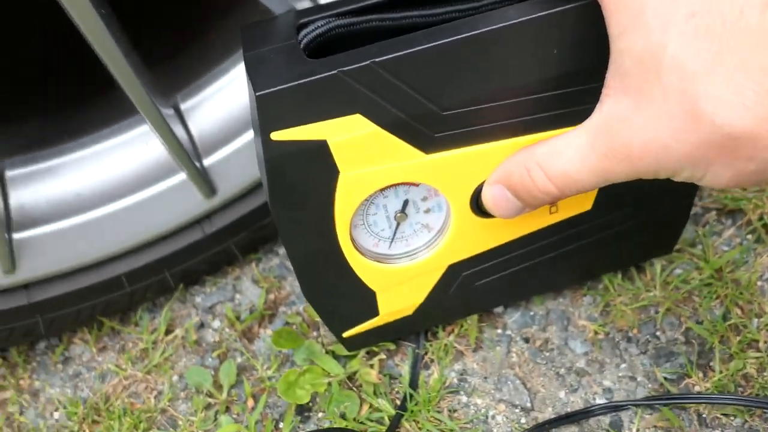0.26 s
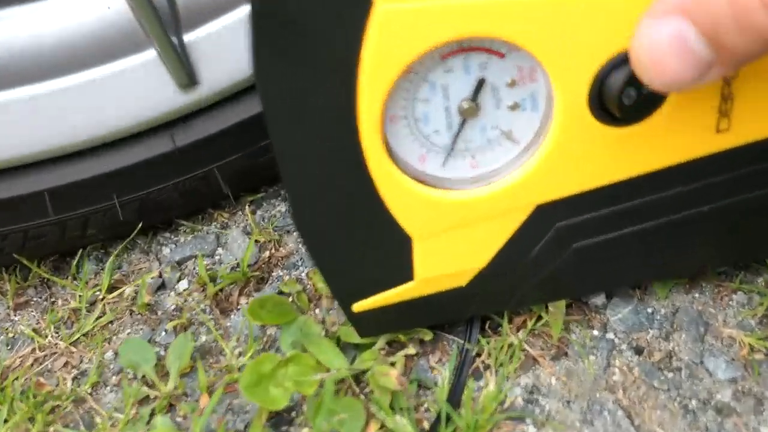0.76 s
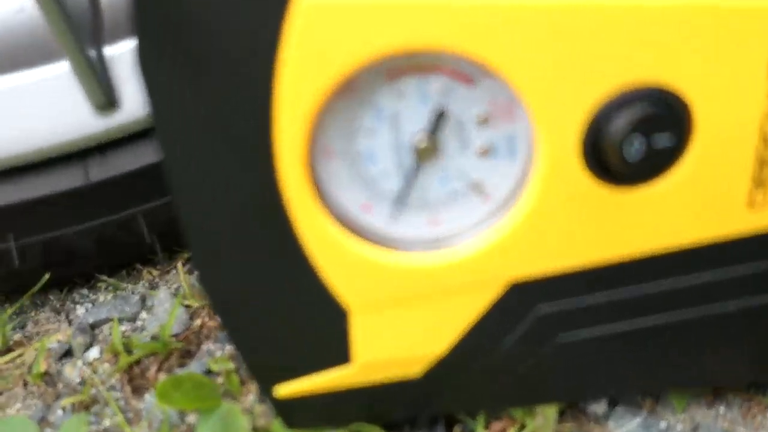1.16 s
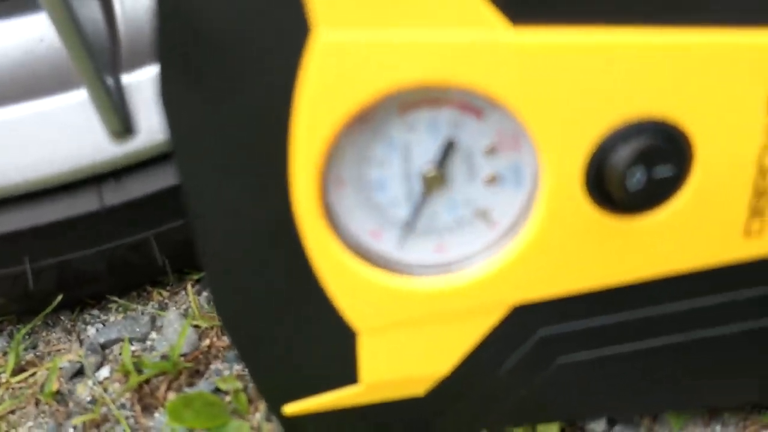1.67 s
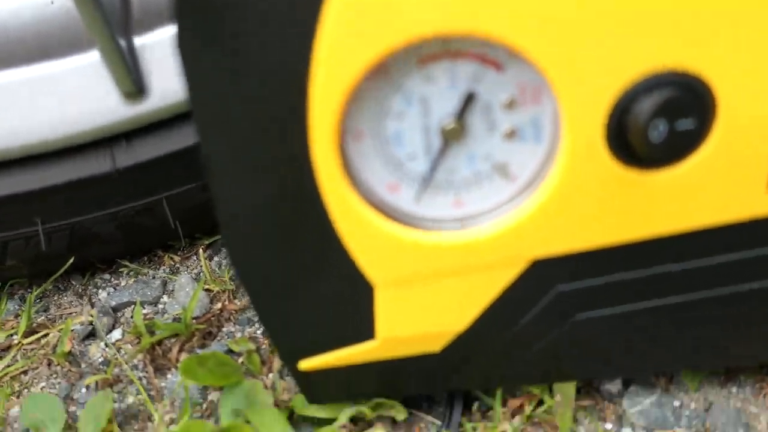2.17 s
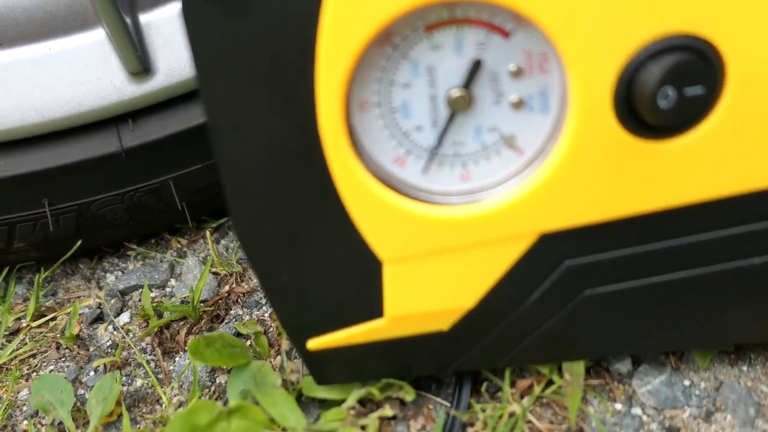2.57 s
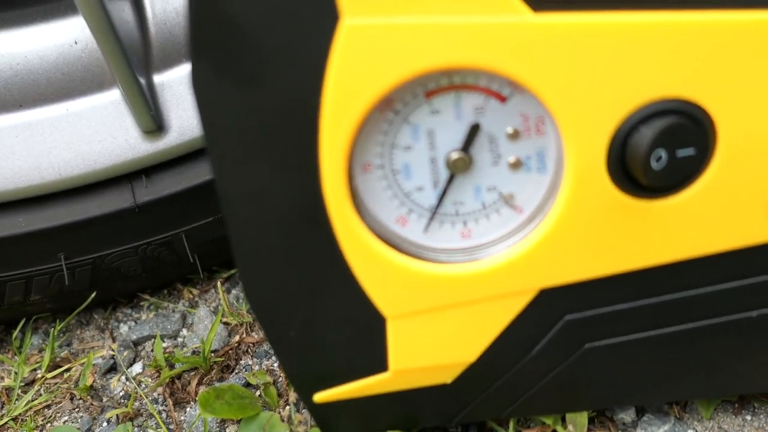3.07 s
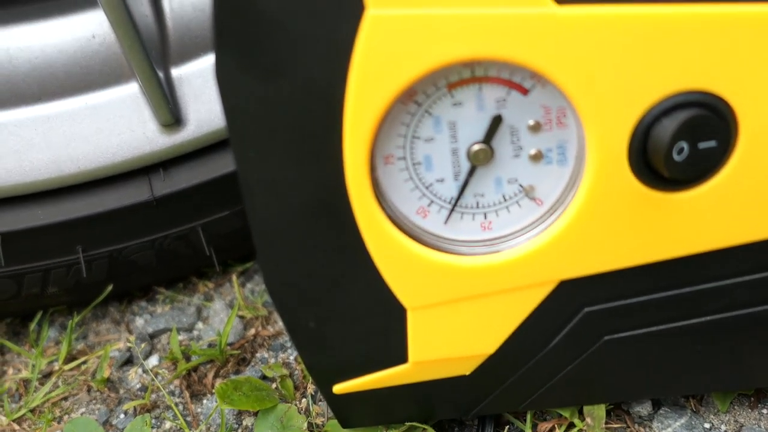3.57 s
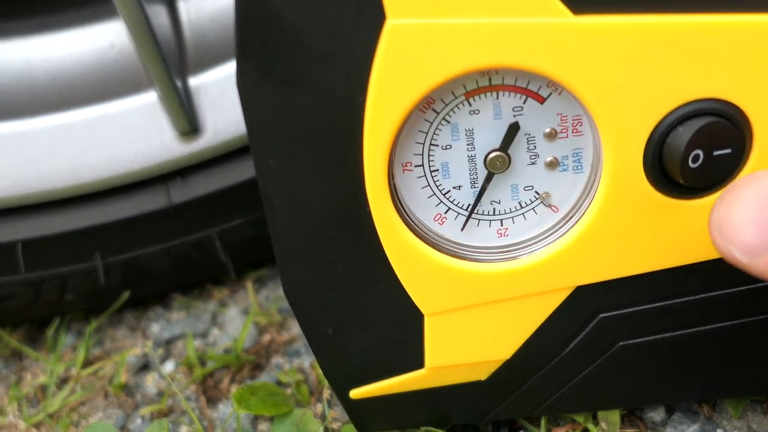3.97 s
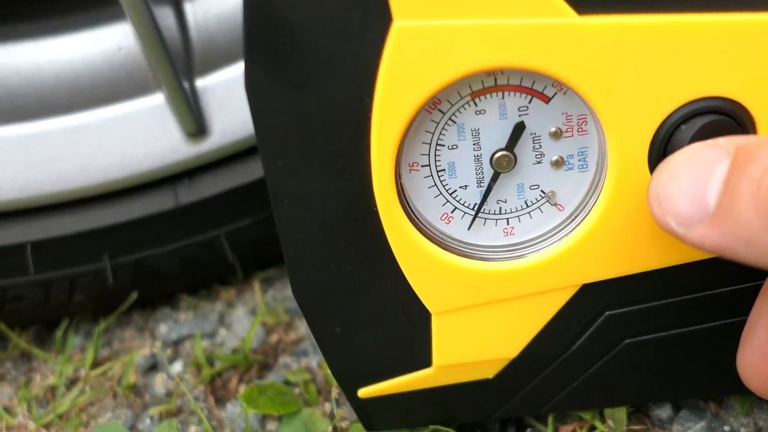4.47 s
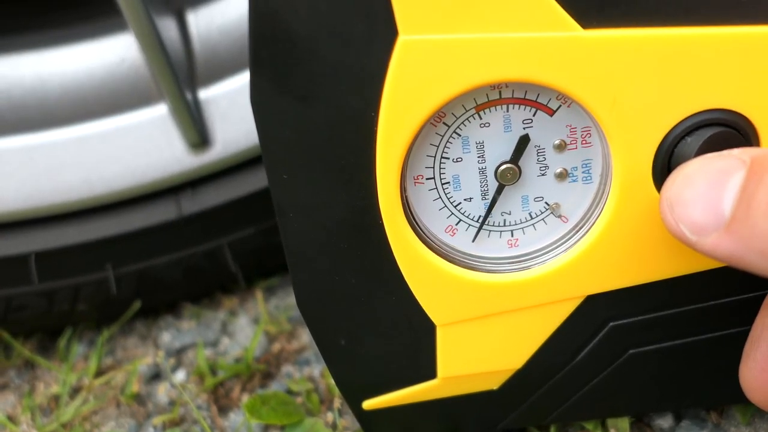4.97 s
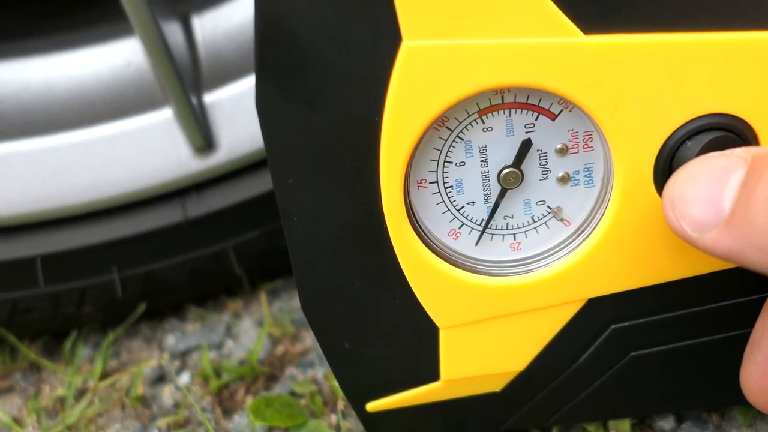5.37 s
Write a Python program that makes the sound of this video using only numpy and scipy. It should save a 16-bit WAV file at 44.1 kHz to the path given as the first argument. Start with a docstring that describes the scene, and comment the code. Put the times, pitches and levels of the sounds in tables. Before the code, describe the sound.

A small electric air compressor runs for the whole five and a half seconds, outdoors beside a car, heard close and slightly to the right. It makes a fast, even, buzzing rattle, about 48 piston knocks a second, ringing its plastic casing over a motor hum and a puffing hiss. At first a hand grips the casing; between 0.5 and 0.9 seconds it lets go, and the tone shifts with a brief, thin, high ring. From about 2 to 3 seconds the microphone backs away and the compressor becomes noticeably quieter, then holds that level at the same speed. Short, hard, irregular clacks stand out above the drone, thickest from 2 to 3.5 seconds, then again, a little lower in pitch, from 4 to 5 seconds. A faint, low car idle continues underneath. The compressor is still running at the end.

```python
"""A small piston compressor on gravel beside an idling car, heard from a phone held close.
A fast motor drives the crank through gears; valve knocks and tooth rattle ring the plastic casing
once a turn, over a hum and a puffing hiss. At first a hand grips the casing and changes its ring;
it lets go within a second. The microphone then backs away and the compressor grows quieter, while
hard strokes clack above the rest, mostly from two to five seconds. The car idles throughout."""
import sys
import numpy as np
from scipy import signal
from scipy.fft import rfft, irfft, next_fast_len
from scipy.io import wavfile

SR = 44100
rng = np.random.default_rng(int(sys.argv[2]) if len(sys.argv) > 2 else 0)


def waveform_to_disk(signal):
    """Save audio, clipped to [-1, 1], as 16-bit WAV at the path in sys.argv[1]."""
    frames = np.transpose(np.atleast_2d(signal))
    scaled = np.clip(frames, -1, 1) * 32767
    samples = np.round(scaled).astype(np.int16)
    wavfile.write(sys.argv[1], SR, samples)


N = 247842

# idling engine: time_s, firing_hz, level_db
CAR_IDLE = [(0, 25.97, -53), (.9, 25.74, -56.5), (1.5, 26.3, -56), (2, 26.45, -57.5), (2.6, 26.04, -56.5),
            (3.6, 26.32, -56), (4.4, 25.97, -58), (5.62, 26.1, -58)]
# exhaust harmonics 2, 3, ... of the firing rate: relative_db
EXHAUST_HARMONICS = [-17, -4, -1, 1.1, 1.5, -7.5, -2, -14, 1, -1.5, -4, -32]
# thin hiss at the very top: time_s, level_db
TOP_HISS = [(0, -47.5), (.9, -49.5), (1.9, -56), (2.3, -54.5), (3.9, -56), (4.4, -59), (5.62, -56.5)]
# spectrum of the valve hiss: frequency_hz, gain_db
VALVE_SPECTRUM = [(100, -49), (400, -12), (672, -3.5), (1350, -9.5), (1620, -4), (2900, -6.5), (3660, -4.5),
                  (5560, -15.5), (9060, -28.5), (12000, -65)]
# speed of the crank: time_s, turns_per_s
CRANK_SPEED = [(0, 47.6), (.75, 47.56), (1.05, 47.71), (1.65, 48.25), (1.95, 48.07), (2.25, 47.62),
               (2.55, 47.58), (4.05, 48.18), (4.65, 47.7), (4.95, 47.87), (5.62, 48.1)]
# compressor at the microphone: time_s, gain_db, drone_lift, treble_db, leftward_lean
AT_MICROPHONE = [(0, -20, -4.5, 1, 0.5), (.5, -22, -1.5, 0.5, 0), (.65, -19.5, 1, 1.5, 0.5),
                 (.8, -21, -1.5, 2.5, 0), (.95, -21, -6.5, 2, -0.5), (1.12, -21, -0.5, 1, -1),
                 (1.18, -21.5, -7, 1, -0.9), (1.25, -21.5, -2.5, 2.5, -0.9), (1.38, -20.5, -7.5, 1, -1.1),
                 (1.42, -20, -13, -5, -1), (1.47, -21, -7.5, 1, -1), (1.6, -21, -6.5, -0.5, -1),
                 (1.7, -21, -11.5, -4.5, -1), (1.95, -22.5, -9, -6, -1.1), (2.1, -24, -12.5, -3, -1.5),
                 (2.2, -27.5, -1.5, 0, -1), (2.45, -25.5, -3, -2, -1.5), (2.55, -28, -7.5, -1, -1),
                 (2.65, -28, -1.5, 1, -1), (2.8, -30, 0, 2, -1), (2.95, -30.5, 3.5, 4.5, -1),
                 (3.25, -30.5, -1.5, 2, -1), (3.38, -30, 4.5, 3, -1), (3.5, -31.5, 0, 4.5, -1),
                 (3.7, -33, 4, 6, -1), (4.2, -30, -3, 0.5, -1), (4.45, -31, -1.5, 1.5, -1),
                 (4.75, -30, -9, 0.5, -1), (5.62, -29.5, -9, -0.5, -1)]
# hand on the casing, thumb on the switch panel, microphone (all 0-1): time_s, hand, thumb, distance
POSES = [(0, 0.89, 0.87, 0), (.5, 0.91, 0.73, 0.1), (.56, 0.63, 0, 0.4), (.76, 0.33, 0, 0.1),
         (.87, 0.11, 0, 0), (1.6, 0.01, 0.14, 0.13), (2.1, 0.03, 0.2, 0.28), (2.5, 0.01, 0, 0.44),
         (3.4, 0.04, 0, 0.52), (3.95, 0, 0, 0.76), (4.2, 0.08, 0, 0.8), (4.7, 0, 0, 1),
         (5.62, 0.02, 0.04, 1)]
# tones of the hum: motor_multiple, crank_multiple, gripped_db, near_db, midway_db, far_db
HUM_TONES = [(0, 5, -50, -31, -27, -22), (0, 6, -29, -46, -50, -50), (0, 7, -41, -24, -18.5, -16),
             (0, 8, -50, -34, -28, -23), (0, 9, -32, -19, -13, -12), (0, 10, -23, -18, -19.5, -16),
             (0, 11, -17, -19, -18, -20), (0, 12, -14, -45, -50, -40), (0, 13, -31, -17, -15, -16),
             (0, 14, -15, -18, -21, -21), (0, 15, -50, -28, -25, -22), (0, 16, -25, -22, -22, -17),
             (0, 18, -23.5, -16, -14, -18.5), (0, 19, -17, -17, -20, -20.5), (0, 20, -28, -22, -27, -28),
             (0, 21, -21, -30, -29, -33), (0, 22, -21, -35, -44, -35.5), (0, 23, -40, -24, -23, -24),
             (0, 24, -24.5, -22, -27, -27), (0, 26, -38, -33, -33, -37), (1, -1, -40, -32, -25.5, -22.5),
             (1, 3, -44, -29, -31, -25), (1, 4, -50, -27, -21, -17.5), (1, 5, -32, -28, -26, -21),
             (1, 8, -43, -18, -19.5, -17), (1, 9, -12, -45, -50, -48), (2, 3, -22, -20, -26, -21),
             (2, 4, -25, -18.5, -17, -14), (2, 5, -21, -14, -19, -17), (3, -4, -13, -25, -20, -16),
             (3, -3, -1.5, -20, -19, -15), (3, -2, -7, -12, -12, -12.5), (3, -1, -43, -15.5, -11.5, -14),
             (3, 0, -47, -23, -17.5, -21)]
# casing modes: pitch_hz, width_hz, gripped_db, near_db, midway_db, far_db, angle_turns, knock_depth
CASING_MODES = [(292, 174, -19.5, -28, -22.5, -20, 0.136, 9), (429, 89, -32, -17, -9.5, -4, 0.12, 4),
                (549, 70, 0, -8, -7, -6, 0.175, 4.5), (670, 48, 5, -18, -7, 1.5, 0.036, 9.5),
                (738.5, 89, -6.5, 3.5, 1.5, -2.5, 0.202, 8), (948, 87, -28, -6.5, -7, -11.5, 0.2, -5.5),
                (1028, 93, -0.5, -14.5, -13.5, -12.5, 0.5, 8.5),
                (1215, 207, -26.5, -8, -12.5, -13, 0.3, 2.5), (1632, 72, -13.5, -9.5, -8, -12.5, 0.52, 7.5),
                (2139, 57, -15.5, -15.5, -18, -12.5, 0.35, 9.5),
                (2385, 96, -17.5, -11.5, -14, -12.0, 0.1018, 10.5),
                (2730, 210, -48, -11, -11.0, -18, 0.2, 7), (3102, 99, -13, -11.5, -12, -17.5, 0.26, 8.5),
                (3420, 48, -17, -15, -21, -15, 0.46, 8.5), (3602, 190, -9.5, -12.5, -10.5, -6.0, 0.26, 7),
                (3802, 116, -5.5, -7.5, -7, -10.5, 0.26, 6), (4114, 95, -7.5, -6.5, -9, -9.5, 0.32, 7),
                (4270, 81, -10, -8, -8.5, -16, 0.32, 7), (4552, 62, -25, -10, -6.5, -11, 0.15, 8.5),
                (4703, 190, -16.5, -16, -22.0, -18, 0.2, 8.5),
                (5020, 122, -21, -17.5, -24.5, -25.5, 0.22, 8),
                (5800, 900, -29, -40.0, -48, -46, 0.33, 8.5), (7106, 450, -22, -21.5, -27, -24.5, 0.27, 10),
                (8880, 740, -22.5, -30.5, -30.5, -30.0, 0.31, 11.5),
                (10170, 530, -37, -35.5, -37, -31, 0.22, 12)]
# panels that sing as the thumb lifts: peak_s, spread_s, pitch_hz, width_hz, relative_db
RELEASE_RINGS = [(0.63, 0.19, 4460, 83, -1), (0.63, 0.22, 4230, 130, -4), (.8, 0.089, 9700, 580, -23)]
# hard strokes: time_s, relative_db, centre_hz
HARD_STROKES = [(0.9594, -19.5, 2300), (1.804, -29, 4300), (1.9486, -23, 3000), (2.06, -22, 1635),
                (2.103, -17, 2180), (2.1203, -23, 3800), (2.1363, -18, 2960), (2.1806, -35, 4600),
                (2.221, -20, 3850), (2.242, -23.5, 3810), (2.2627, -30, 4180), (2.3077, -27, 4200),
                (2.3264, -23, 3770), (2.3677, -32, 4580), (2.3948, -26, 4080), (2.4144, -21, 3110),
                (2.452, -29, 3840), (2.476, -35, 3830), (2.4935, -30, 3930), (2.5393, -26.5, 4560),
                (2.5588, -26, 3560), (2.5826, -29, 3630), (2.6234, -35, 3970), (2.644, -32, 4500),
                (2.685, -30, 3840), (2.708, -32, 3100), (2.75, -25, 3100), (2.8536, -30, 3820),
                (2.8733, -21, 3070), (2.8953, -28, 3890), (2.918, -32, 4060), (2.957, -31, 2900),
                (2.9783, -26, 3150), (3.0003, -27, 4260), (3.021, -24, 2750), (3.0842, -31, 4500),
                (3.1031, -24, 3160), (3.145, -30, 3640), (3.208, -30, 3100), (3.2891, -25, 3600),
                (3.3317, -22.5, 2900), (3.349, -29, 2450), (3.3734, -37, 3700), (3.416, -33, 4270),
                (3.437, -31, 4290), (4.076, -26, 1640), (4.094, -29, 1640), (4.164, -26, 2420),
                (4.170, -22, 2180), (4.186, -29, 2420), (4.21, -28, 2300), (4.3972, -25, 2125),
                (4.4393, -30, 2137), (4.5866, -32, 2154), (4.6276, -21.5, 2174), (4.6708, -22.5, 2125),
                (4.7498, -32, 3660), (4.7746, -29, 2120), (4.817, -29, 2087), (4.861, -30, 2140),
                (4.9032, -33, 2144), (5.0054, -33, 2140), (5.0898, -26, 2400)]
# how far each band follows the compressor's lean to one side: frequency_hz, gain_db
LEAN_SPECTRUM = [(60, -8), (250, 9), (600, -13), (1300, 10), (2400, 13.5), (4400, 8), (8000, -42)]
# sound scattered to the sides by nearby surfaces: frequency_hz, side_minus_mid_db
SCATTER_SPECTRUM = [(60, -33), (200, -15.5), (700, -17), (1290, -9.5), (2380, -18), (4400, -49),
                    (8120, -18.5), (15000, 21)]
# spectra of the three background noises: frequency_hz, gain_db
BREEZE_SPECTRUM = [(15, -3), (35, .1), (70, -5), (150, -50)]
RUMBLE_SPECTRUM = [(50, -6), (120, 7), (300, 3), (450, -28)]
TOP_HISS_SPECTRUM = [(8000, -1), (10500, 5), (15500, 0)]

GEAR_RATIO = 60 / 11  # motor turns per crank turn
PANEL_LOW_HZ, PANEL_HIGH_HZ = 900, 1300  # the switch panel's band, which follows the thumb
TREBLE_HZ, NARROW_WIDTH_HZ = 6000, 88
SIDE = np.array([[1], [-1]])  # adds on the left, subtracts on the right


def undb(db):
    """Decibels to amplitude."""
    return np.exp(np.asarray(db) * (np.log(10) / 20))


def curves(table):
    """Columns of a time table, one value a sample."""
    times, *columns = np.transpose(table)
    return [np.interp(np.arange(N) / SR, times, column) for column in columns]


def unit_rms(x):
    """Scales x to an RMS of 1."""
    return x / np.sqrt(np.mean(x ** 2))


def ring(x, hz, width_hz):
    """A steep resonance (applied twice), gain 1 at its centre."""
    b, a = signal.iirpeak(hz, hz / width_hz / 1.55, SR)
    return signal.sosfilt([[*b, *a]] * 2, x)


def colour(x, spectrum):
    """Filters x through a curve of (Hz, dB) points."""
    hz, db = np.transpose(spectrum)
    size = next_fast_len(N)
    bins_hz = np.maximum(np.fft.rfftfreq(size, 1 / SR), 1)
    gain = undb(np.interp(np.log(bins_hz), np.log(hz), db))
    return irfft(rfft(x, size) * gain, size)[..., :N]


def noise(spectrum):
    """Coloured noise with an RMS of 1."""
    return unit_rms(colour(rng.standard_normal(N), spectrum))


def wander(per_s):
    """A smooth random curve, spread near 1."""
    count = int(N / SR * per_s) + 3
    return np.interp(np.arange(N) / SR * per_s, np.arange(count), rng.standard_normal(count))


def posed_db(hz, pose, gripped_db, *free_db):
    """Level of a mode or tone: gripped, or free and heard from near, midway or far."""
    hand, thumb, distance = pose
    grip = thumb if PANEL_LOW_HZ < hz < PANEL_HIGH_HZ else hand
    return grip * gripped_db + (1 - grip) * np.interp(distance, [0, .5, 1], free_db)


def knock(turns, angle):
    """Shape of a knock over the turn, from -1 to 1: quick rise, slower fall."""
    phase = 2 * np.pi * (turns - angle)
    return np.cos(phase - .5 * (1 - np.cos(phase)))


def stroke_strength(turns):
    """Strokes vary: the motor's unbalance meets the crank at a new angle every turn, plus scatter."""
    strokes = np.arange(int(turns[-1]) + 2)
    unbalance = 1.4 * np.cos(2 * np.pi * GEAR_RATIO * strokes)
    return np.interp(turns, strokes, unbalance + 1.6 * rng.standard_normal(len(strokes)))


def breeze():
    """Faint deep rumble of moving air at the microphones."""
    return undb(-85) * (noise(BREEZE_SPECTRUM) + .4 * noise(BREEZE_SPECTRUM) * SIDE)


def surface_scatter(direct):
    """Nearby surfaces return a short, diffuse tail."""
    tail = rng.standard_normal(8000) * np.exp(-np.arange(8000) / 1600)
    reflected = signal.fftconvolve(direct, tail / np.linalg.norm(tail))[:N]
    return colour(reflected, SCATTER_SPECTRUM)


def idling_car():
    """Even exhaust pulses of the engine over its rumble."""
    firing_hz, level_db = curves(CAR_IDLE)
    firings = np.cumsum(firing_hz) / SR - .05
    rumble = undb(-3) * noise(RUMBLE_SPECTRUM)
    exhaust = 0
    for harmonic, db in enumerate(EXHAUST_HARMONICS, start=2):
        amplitude = np.sqrt(2) * undb(db + .65 * wander(4.76))
        exhaust += amplitude * np.cos(2 * np.pi * harmonic * firings)
    return undb(level_db) * (rumble + exhaust)


def top_hiss(turns):
    """Thin hiss near the centre that flickers and pulses with the crank."""
    mid, side = noise(TOP_HISS_SPECTRUM), noise(TOP_HISS_SPECTRUM)
    db = curves(TOP_HISS)[0] + 2 * knock(turns, .27) + 2.5 * wander(24.12)
    return undb(db) * (mid + .06 * side * SIDE)


def valve_hiss(turns, lift):
    """Air puffs through the valves once a turn."""
    puff = undb(2 * knock(turns, .47) + .5 * stroke_strength(turns) + .7 * lift)
    return undb(-7.5) * unit_rms(colour(puff * rng.standard_normal(N), VALVE_SPECTRUM))


def hum(turns, pose, drone):
    """Tones locked to crank and motor; high ones waver more in level."""
    hand, start_speed = pose[0], CRANK_SPEED[0][1]
    slip_cycles = .09 * (1 - hand / 2)  # gripped, the phase slips half as far
    tones = 0
    for motor, crank, *levels in HUM_TONES:
        order = motor * GEAR_RATIO + crank
        waver_db = (2.5 + .97 * np.log2(order / 23)) * wander(14)
        db = posed_db(order * start_speed, pose, *levels) + waver_db
        cycles = order * turns + slip_cycles * wander(9) + rng.random()
        tones += undb(db) * np.sin(2 * np.pi * cycles)
    return undb(1.5 + .46 * drone) * tones


def clacks():
    """A few ms of bouncing contact ring the casing, most of all the modes near each clack's centre."""
    time_s, db, centre_hz = np.transpose(HARD_STROKES)
    samples = np.arange(600)
    first_hit = 21 * (samples == 0)
    bounces = .45 * rng.laplace(size=(len(time_s), len(samples)))
    contact = (first_hit + bounces) * np.exp(-samples / SR / .0088) * undb(db)[:, None]
    places = ((time_s - .002) * SR).astype(int)[:, None] + samples
    ringing = 0
    for hz, width_hz, *_ in CASING_MODES:
        if PANEL_HIGH_HZ < hz < TREBLE_HZ:
            broad = .17 * (hz < 4900)
            focused = np.exp(-(np.log(hz / centre_hz[:, None]) / .094) ** 2)
            force = np.zeros(N)
            np.add.at(force, places, contact * (broad + focused))
            ringing += ring(force, hz, width_hz) / np.sqrt(width_hz)
    return undb(32) * ringing


def rattle(turns, repeat_share=.26, wear_turns=14.1, slots=900):
    """Tooth and valve clatter, a stream a mode: part repeats each turn and slowly wears, part is fresh."""
    wear = turns / wear_turns
    place = wear.astype(int) * slots + (turns % 1 * slots).astype(int)
    crossfade = wear % 1 * np.pi / 2
    old, new = np.sqrt(repeat_share / 2) * np.array([np.cos(crossfade), np.sin(crossfade)])
    fresh = np.sqrt((1 - repeat_share) / 2) * rng.laplace(size=N)
    while True:
        pattern = rng.laplace(size=(int(wear[-1]) + 2) * slots)
        yield pattern[place] * old + pattern[place + slots] * new + np.roll(fresh, rng.integers(N))


def valve_strike(valve_turns, hz, width_hz, depth):
    """One clean impulse a turn on a mode below the treble; the deeper its knock, the harder."""
    weight = .35 if hz < PANEL_LOW_HZ else 1.6 if width_hz < NARROW_WIDTH_HZ else 1.1
    strength = 38 * weight * (hz < TREBLE_HZ) * (max(depth, 0) / 9) ** 3
    impulses = np.diff(np.floor(valve_turns + .05), prepend=0)
    return strength * np.maximum(impulses, 0)


def casing(turns, pose, drone, chatter, treble_db):
    """Knocks ring each mode at its own angle of the turn; grip and distance reweigh the modes."""
    stroke = stroke_strength(turns) + 1.5 * np.cos(2 * np.pi * 6 * turns)  # six smaller bumps a turn
    seating = turns + .005 * wander(40)  # the valve seats a little early or late
    clatter = rattle(turns)
    ringing = 0
    for hz, width_hz, *levels, angle, depth in CASING_MODES:
        highness = min(hz / 2470, 1)
        # firmly struck modes and narrow upper modes ring more evenly
        flicker = max(1.5 + 1.2 * highness - .22 * depth, .4) * wander(14)
        unevenness = .45 if width_hz < NARROW_WIDTH_HZ and hz > PANEL_HIGH_HZ else 1
        blow_db = .32 * depth * knock(turns, angle) + unevenness * (highness * stroke + flicker)
        force = undb(blow_db) * (next(clatter) + valve_strike(seating - angle, hz, width_hz, depth))
        lift_db = highness * chatter + (1 - highness) * drone + (hz > TREBLE_HZ) * treble_db
        ringing += undb(posed_db(hz, pose, *levels) + lift_db) * ring(force, hz, width_hz)
    for peak_s, spread_s, hz, width_hz, db in RELEASE_RINGS:
        swell = np.exp(-((np.arange(N) / SR - peak_s) / spread_s) ** 2)
        force = undb(3.6 * knock(turns, .24)) * next(clatter)
        ringing += undb(db) * swell * ring(force, hz, width_hz)
    return undb(13) * ringing


def scene():
    """Compressor a little to the right, car in the middle, scattered sound at the sides."""
    turns = np.cumsum(curves(CRANK_SPEED)[0]) / SR
    gain_db, drone_lift, treble_db, leftward = curves(AT_MICROPHONE)
    pose = np.clip(curves(POSES), 0, 1)
    # the casing hops on the gravel, so drone and chatter swell and sink
    drone = drone_lift + 1.25 * wander(22)
    chatter = .26 * wander(22)
    running = casing(turns, pose, drone, chatter, treble_db)
    running += hum(turns, pose, drone)
    running += valve_hiss(turns, chatter + treble_db)
    compressor = undb(gain_db) * running + clacks()
    lean = colour(compressor * (undb(leftward / 2) - 1), LEAN_SPECTRUM)
    mid = compressor + idling_car()
    side = lean + surface_scatter(mid)
    return mid + top_hiss(turns) + side * SIDE


def record(dry):
    """The phone cuts the bass, picks up air rumble at its microphone ports and cuts the top."""
    low_cut = signal.butter(5, 74, "high", fs=SR, output="sos")
    high_cut = signal.ellip(10, .2, 70, 15500, fs=SR, output="sos")
    return signal.sosfilt(high_cut, signal.sosfilt(low_cut, dry) + breeze())


dry = scene()
out = record(dry)
waveform_to_disk(out)
```